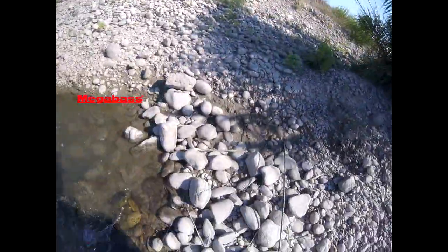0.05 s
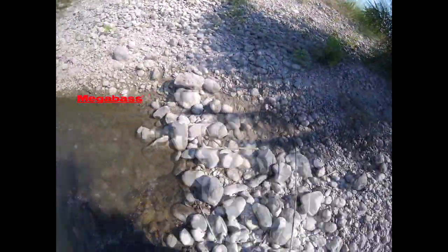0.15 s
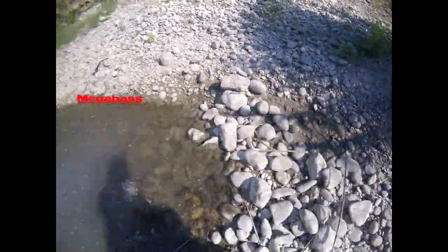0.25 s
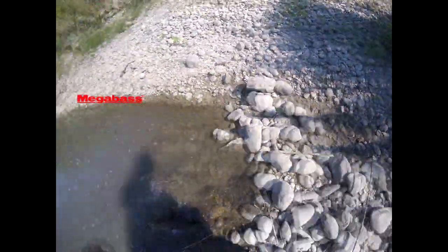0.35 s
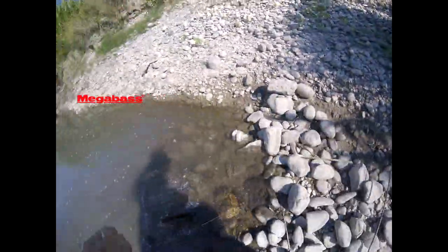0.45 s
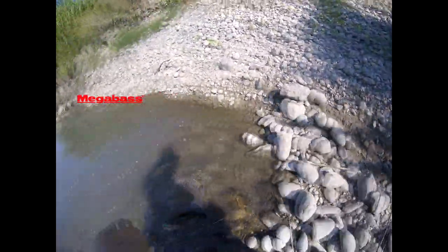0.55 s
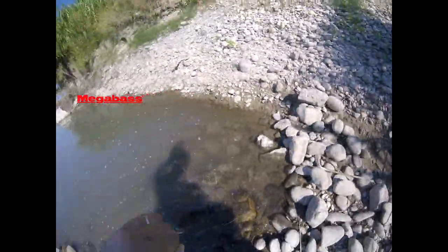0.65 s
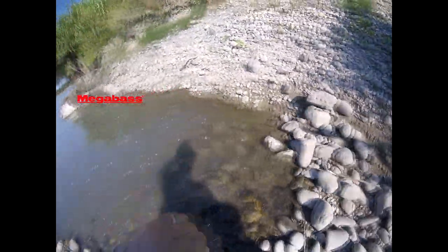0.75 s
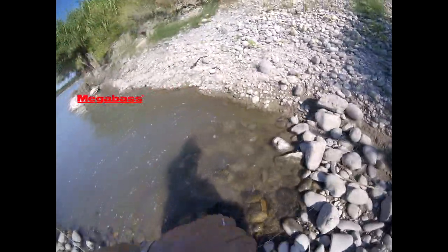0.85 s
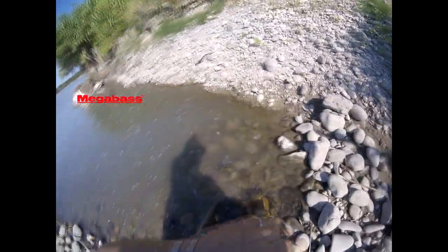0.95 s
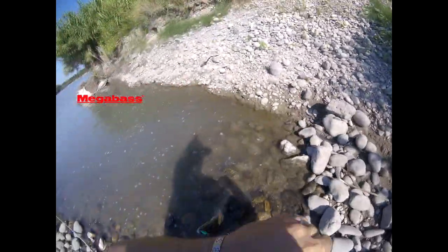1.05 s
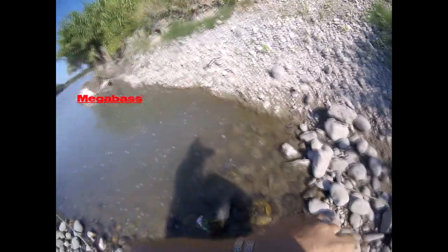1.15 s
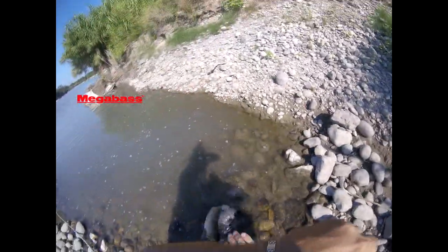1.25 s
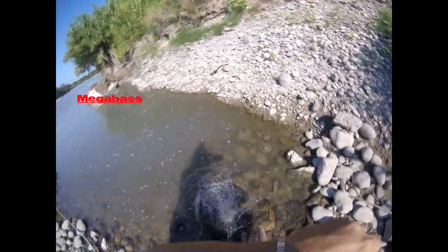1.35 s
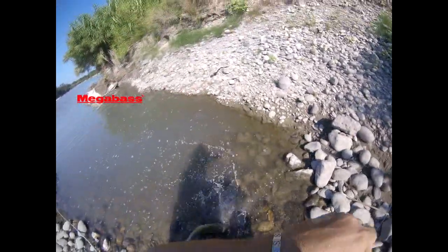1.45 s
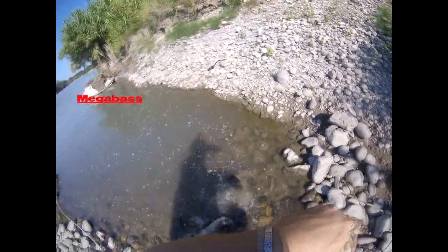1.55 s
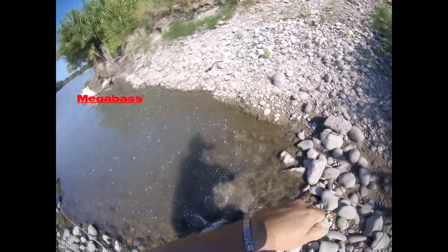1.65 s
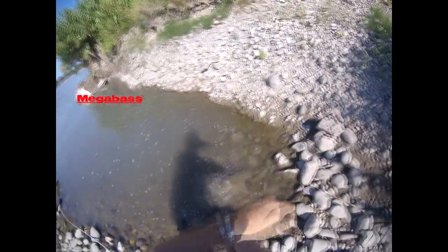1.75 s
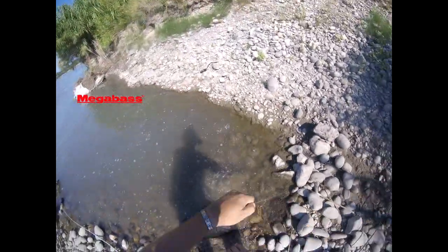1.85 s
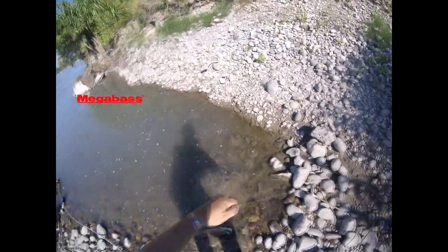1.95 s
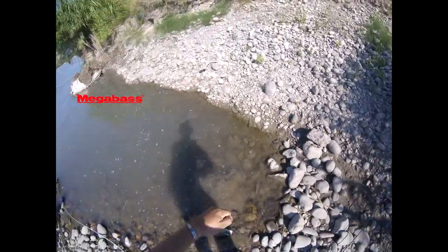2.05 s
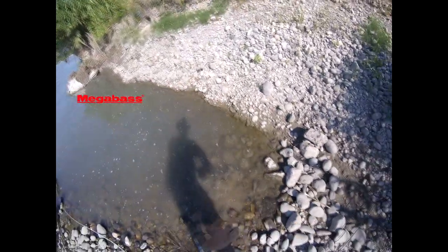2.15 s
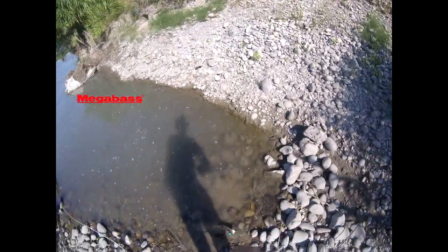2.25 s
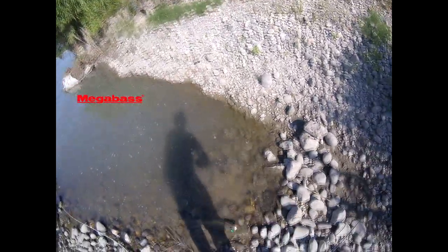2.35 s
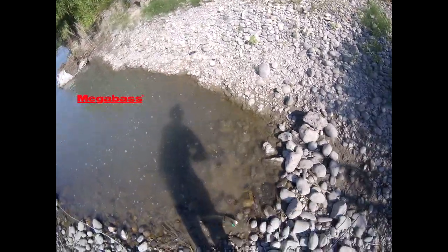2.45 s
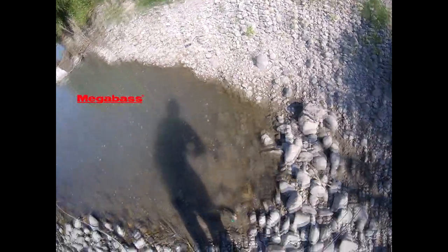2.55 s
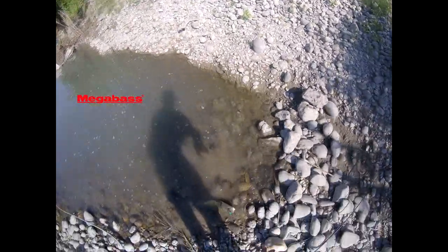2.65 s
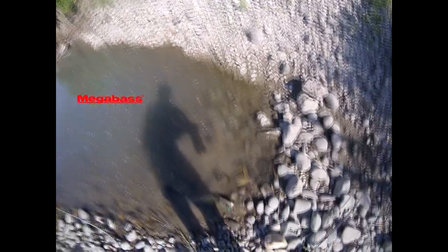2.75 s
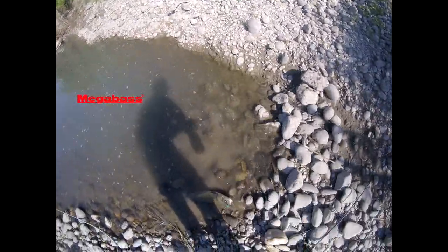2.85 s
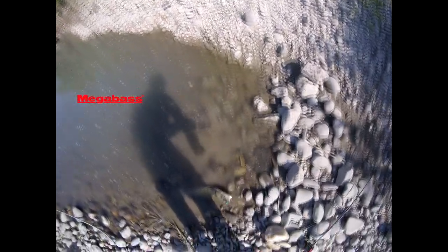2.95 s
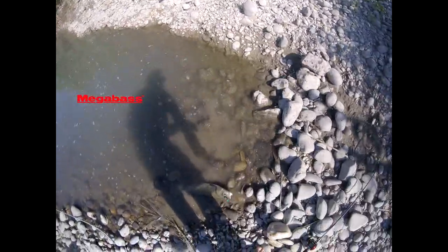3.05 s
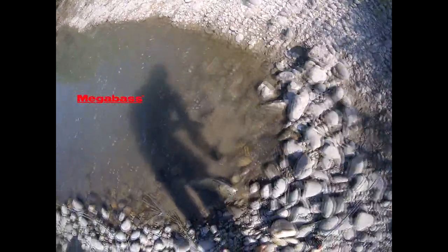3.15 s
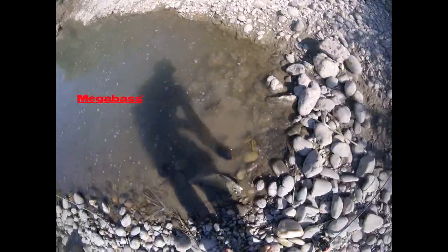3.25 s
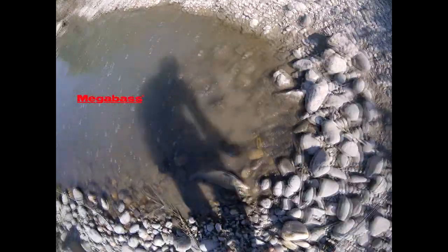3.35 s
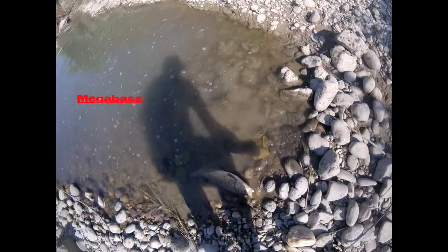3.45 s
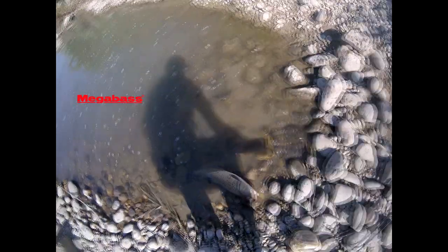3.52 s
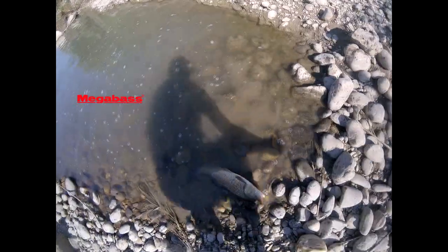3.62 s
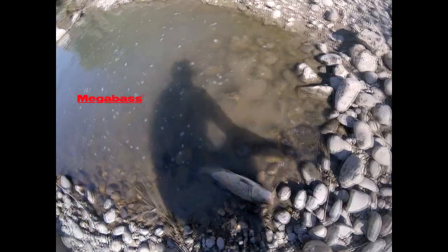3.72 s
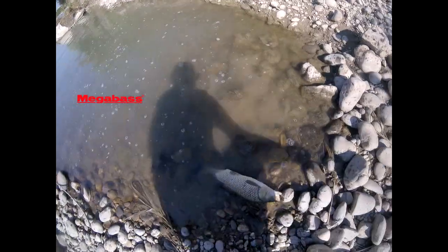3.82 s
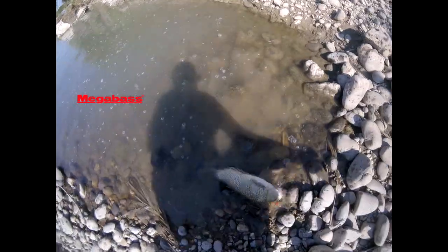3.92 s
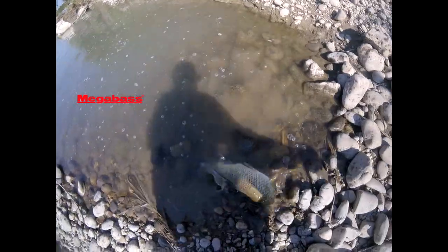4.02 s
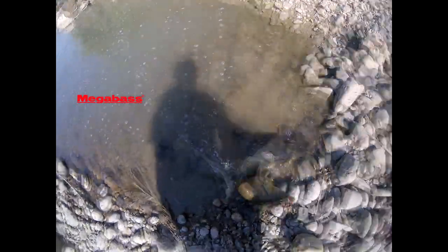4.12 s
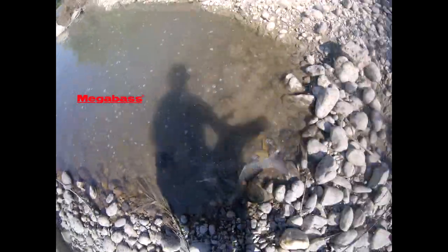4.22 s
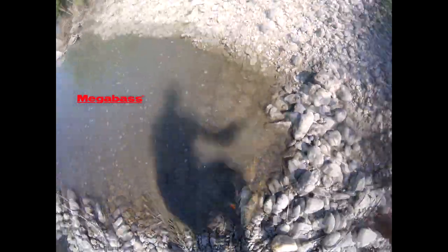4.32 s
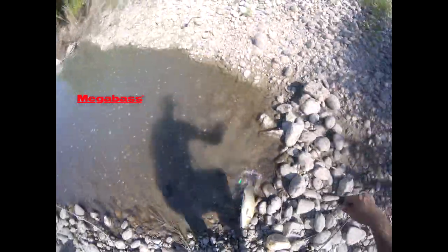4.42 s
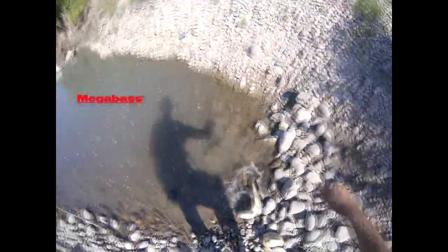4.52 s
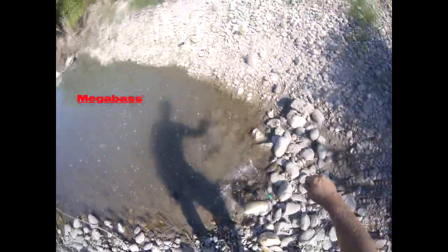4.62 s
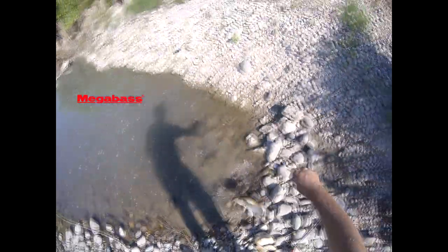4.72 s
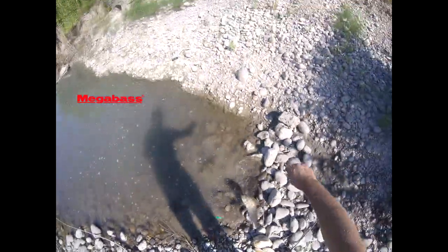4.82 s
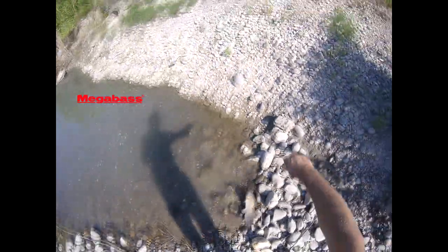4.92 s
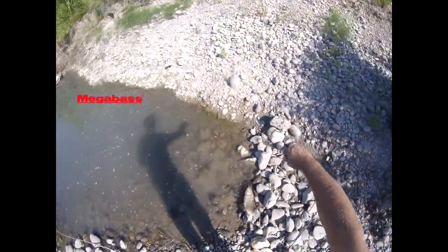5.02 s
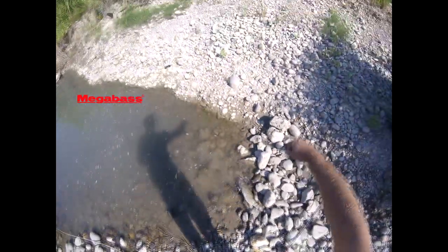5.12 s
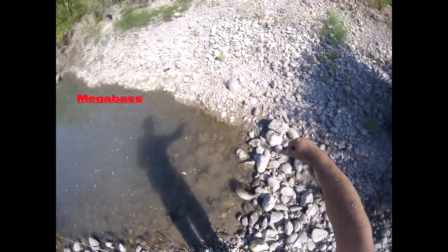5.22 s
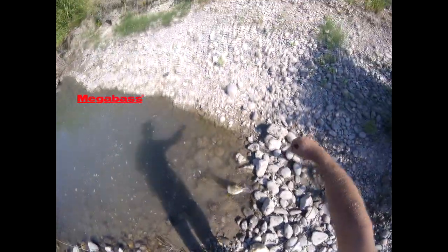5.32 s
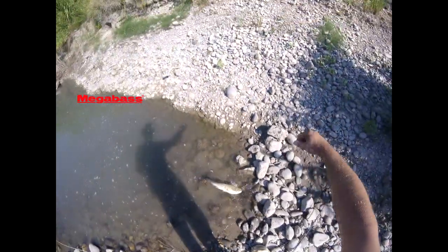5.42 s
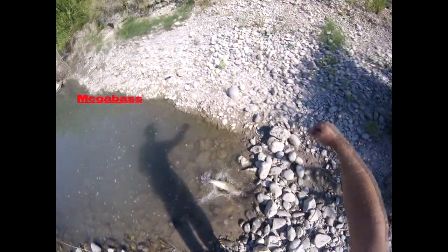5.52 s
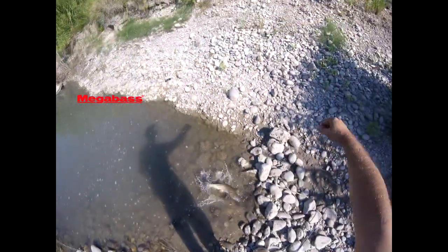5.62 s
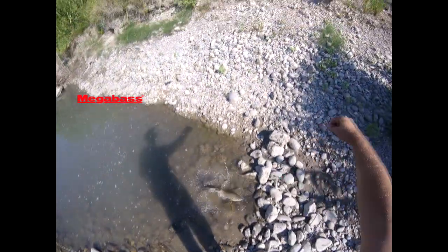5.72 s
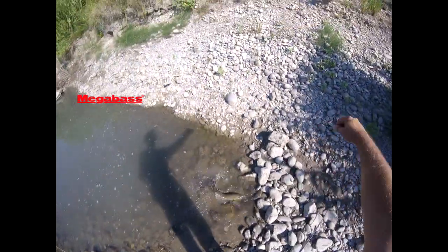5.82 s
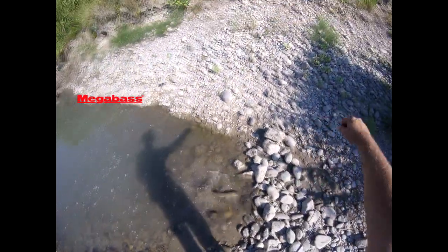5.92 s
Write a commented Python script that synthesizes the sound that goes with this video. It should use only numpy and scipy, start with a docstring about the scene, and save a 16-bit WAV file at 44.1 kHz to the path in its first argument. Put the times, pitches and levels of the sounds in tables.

```python
"""Hooked fish in the shallows

A fish thrashes by a stony river bank, heard by a small camera in a closed housing.
Slaps and drops are sharp blows with grainy bursts of noise; churning water is lumpy noise with tiny bubbles.
The housing gives both a broad hump near 2 kHz and a narrow port resonance near 6.5 kHz.
Larger bubbles are decaying tones; the far river, wind, knocks and hiss are coloured noise."""
import sys
import numpy as np
from scipy import signal
from scipy.fft import rfft, irfft
from scipy.io import wavfile
from scipy.ndimage import uniform_filter1d, map_coordinates

SR = 44100
rng = np.random.default_rng(int(sys.argv[2]) if len(sys.argv) > 2 else 0)


def dump(signal):
    """Clip the signal to [-1, 1] and save it as 16-bit WAV at the path in sys.argv[1]."""
    limited = np.clip(np.atleast_2d(signal).T, -1, 1)
    pcm = np.round(limited * 32767).astype(np.int16)
    wavfile.write(sys.argv[1], SR, pcm)


N = 263277  # length in samples


def amp(db):
    """Turns decibels into gain."""
    return 10 ** (np.asarray(db) / 20)


def unit(x):
    """Scales a signal to rms 1."""
    return x / np.sqrt(np.mean(x ** 2) + 1e-20)


def curves(rows):
    """Draws straight lines between rows: one value per sample for each column after the time."""
    seconds, *columns = np.transpose(rows)
    return [np.interp(np.arange(N) / SR, seconds, column) for column in columns]


def wobble(rate):
    """A smooth random curve through a given number of random points a second."""
    points = rng.standard_normal(int(N * rate / SR) + 4)
    return map_coordinates(points, [np.arange(N) * rate / SR])


def response(points, size=8192):
    """A filter of energy 1 with the shape of (Hz, dB) points, its sound packed towards the start."""
    hz = np.fft.rfftfreq(size, 1 / SR)
    point_hz, point_db = np.transpose(points)
    gain = amp(np.interp(np.log(hz + 1), np.log(point_hz), point_db))
    # folding the cepstrum (the spectrum of the log gain) makes the filter minimum phase
    cepstrum = irfft(np.log(gain + 1e-7))
    cepstrum[1:size // 2] *= 2
    cepstrum[size // 2 + 1:] = 0
    impulse = irfft(np.exp(rfft(cepstrum)))
    return impulse / np.linalg.norm(impulse)


def rush(points, patchy_db):
    """Coloured noise of rms 1, with patches of random gain across time and pitch."""
    spectrum = signal.stft(rng.standard_normal(N + 512), nperseg=512)[2]
    patches = uniform_filter1d(rng.standard_normal(spectrum.shape), size=6, axis=0)
    patches = uniform_filter1d(patches, size=10, axis=1)
    patchy_noise = signal.istft(spectrum * amp(patchy_db * unit(patches)), nperseg=512)[1]
    return unit(signal.fftconvolve(patchy_noise, response(points))[:N])


def ring(rows, size=4096):
    """Sum of bubbles: each is a tone with a soft start, a steady decay and a gliding pitch."""
    start, hz, db, t60, rise = np.transpose(rows)[:, :, None]
    t = np.arange(size) / SR
    envelope = amp(db - 60 * t / t60) * (1 - np.exp(-t * hz / 1.44))
    tone = envelope * np.sin(2 * np.pi * hz * (t + rise * t * t / 2))
    at = np.round(start * SR).astype(int) + np.arange(size)
    return np.bincount(at.ravel(), tone.ravel(), N + size)[:N]


def swarm(low_hz, high_hz, cycles, spread_db, count, size):
    """Many random bubbles, together of rms 1, uneven in pitch, level and life."""
    u = rng.random((count, 5))
    start = u[:, 0] * N / SR
    hz = low_hz * (high_hz / low_hz) ** u[:, 1]
    db = spread_db * u[:, 2] ** 3  # a few stand out
    t60 = cycles * 3 ** u[:, 4] / hz
    rise = 0.94 * u[:, 3] / t60
    rows = np.array([start, hz, db, t60, rise])
    return unit(ring(rows.T, size))


# How hard the water churns before the housing; the drips and the gurgle follow it too.
# Each row: time in seconds, body level in dB, spray level in dB over the body.
CHURN_LEVELS = [(0.0, -39, -14), (0.11, -45.5, -9.5), (0.33, -50, -10.5), (0.53, -58.5, -8.5),
                (1.1, -61.5, -9), (1.3, -42.5, -9.5), (1.47, -44, -6.5), (1.6, -42, -4.5),
                (1.68, -41, -12.5), (1.8, -46, -5.5), (1.97, -62.5, -3.5), (2.2, -66, -2), (2.5, -75, -7),
                (3.5, -71.5, -10), (3.91, -58, -8), (3.97, -42.5, -8.5), (4.13, -43.5, -9), (4.3, -54.5, 2),
                (4.53, -46.5, -9), (4.78, -56.5, -2), (5.1, -59, -5.5), (5.28, -59, -13), (5.49, -62.5, -3),
                (5.65, -49, -9.5), (5.72, -51, -5.5), (5.97, -64, -3)]


def churn():
    """Sloshing water: noise in lumps, with bubbles in the body and fine droplets in the spray."""
    body_db, spray_db = curves(CHURN_LEVELS)
    lumps_db = 1.3 * wobble(60) + 1.65 * wobble(300)  # shared by body and spray
    bubbling = swarm(443.7, 4080, cycles=12.6, spread_db=14.5, count=4500, size=1100)
    body = unit(1.1 * rng.standard_normal(N) + bubbling)
    droplets = swarm(3210, 17400, cycles=7.6, spread_db=14.5, count=7000, size=200)
    spray = unit(1.35 * rng.standard_normal(N) + droplets)
    lumpy_body = unit(body * amp(lumps_db + 2.3 * wobble(150)))
    lumpy_spray = unit(spray * amp(lumps_db + 1.3 * wobble(120)))
    return np.array([amp(body_db) * lumpy_body, amp(body_db + spray_db) * lumpy_spray])


# How the housing colours the body of a splash: a hump near 2 kHz, falling away steeply above 4 kHz.
# Each row: frequency in Hz, relative gain in dB.
HOUSING_BODY = [(150, -43), (250, -10), (443, -13), (618, -14.5), (739, -9.5), (937, -9.5), (1230, -5.5),
                (2060, 5), (4300, -18.5), (5590, -69), (9460, -120)]
# How the housing colours the spray, strongest at the port resonance.
# Each row: frequency in Hz, relative gain in dB.
HOUSING_SPRAY = [(2200, -48), (3700, -17), (4250, -14), (4890, -5), (5450, -4), (5920, -9.5), (6340, -1.5),
                 (6540, 1.5), (6770, -5), (7340, -21), (8600, -30), (9500, -26), (10300, -34),
                 (14300, -49.5), (16000, -63)]


def housing(body, spray):
    """The case filters the body of a splash and its spray separately, then adds them."""
    coloured_body = signal.fftconvolve(body, response(HOUSING_BODY))
    coloured_spray = signal.fftconvolve(spray, response(HOUSING_SPRAY))
    return (coloured_body + coloured_spray)[:N]


# Single bubbles that stand out.
# Each row: start in seconds, starting pitch in Hz, level in dB, time to fall 60 dB in seconds,
# pitch rise as a share of the starting pitch per second (negative falls).
SINGLE_BUBBLES = [(0.0, 986, -26, 0.049, 26), (0.053, 1880, -9, 0.0082, 13), (0.103, 417, -36, 0.08, 13.5),
                  (0.146, 1470, -31, 0.027, 35), (0.151, 568, -36, 0.091, 32),
                  (0.171, 1470, -27.5, 0.043, 15), (0.23, 1940, -30.5, 0.034, -2),
                  (0.354, 656, -34, 0.041, 36), (0.393, 253, -29.5, 0.15, 11), (0.466, 1024, -36, 0.052, 1),
                  (0.541, 700, -34, 0.072, 0.5), (0.755, 1350, -34, 0.043, 12), (0.748, 466, -39, 0.043, 4),
                  (1.19, 990, -30, 0.025, 10), (1.234, 894, -25.5, 0.078, -6.5), (1.26, 259, -20, 0.032, 4),
                  (1.506, 320, -24, 0.025, 5), (1.526, 230, -23.5, 0.032, 4),
                  (1.268, 611, -20.5, 0.11, -2.5), (1.278, 471, -18, 0.037, 4),
                  (1.285, 740, -20, 0.052, -4.5), (1.309, 1106, -24, 0.04, 19),
                  (1.367, 710, -14.5, 0.013, 57), (1.453, 1590, -31, 0.023, 10),
                  (1.625, 402, -34, 0.06, -2), (1.69, 452, -37.5, 0.1, 0.5),
                  (1.708, 1323, -25.5, 0.068, 25.5), (1.95, 1110, -38.5, 0.059, 14.5),
                  (3.802, 880, -32, 0.023, 49), (3.924, 840, -21.5, 0.025, -4), (3.943, 734, -27, 0.052, 1),
                  (4.019, 1570, -15, 0.025, 35), (4.175, 930, -42, 0.063, 10), (4.273, 676, -18, 0.019, 25),
                  (4.312, 1346, -13.5, 0.02, 47), (4.328, 433, -7, 0.017, 11),
                  (4.518, 400, -37, 0.14, 19.5), (4.55, 800, -39, 0.08, 45), (4.575, 367, -23, 0.024, 28),
                  (4.75, 800, -42.5, 0.068, 18), (4.841, 386, -33.5, 0.043, -1),
                  (4.983, 394, -25, 0.027, 2), (5.382, 1016, -36, 0.042, 4), (5.585, 940, -26.5, 0.031, 39),
                  (5.645, 1460, -23, 0.023, 56), (5.686, 1810, -26, 0.028, 26),
                  (5.773, 2030, -26, 0.014, 16), (5.802, 640, -44, 0.07, 0.5), (5.93, 1290, -40, 0.03, 60),
                  (5.89, 652, -42, 0.076, -1)]


def bubbles():
    """Each pocket of air rings at its own pitch, which glides as the ringing dies."""
    return ring(SINGLE_BUBBLES)


GURGLE_DB = -12.5  # over the churn's body level


def gurgle():
    """Larger bubbles ring at random times, as a swarm that swells and fades with the churn."""
    level_db, _ = curves(CHURN_LEVELS)
    return amp(level_db + GURGLE_DB) * swarm(450, 1994, cycles=19.8, spread_db=10.5, count=700, size=4096)


# The tone colour of the far river. Each row: frequency in Hz, relative level in dB per Hz.
RIVER_COLOUR = [(120, -36.5), (200, -3), (280, -10.5), (360, -8), (470, -10), (890, -11), (1580, -13.5),
                (4200, -29.5), (5940, -31.5), (6510, -15.5), (7300, -27), (8200, -43), (12000, -120)]
RIVER_DB = -58.5  # middle level


def river():
    """Far rushing water blends into steady coloured noise that wavers a little."""
    level_db = RIVER_DB + 0.36 * wobble(2.5)
    return amp(level_db) * rush(RIVER_COLOUR, patchy_db=0.55)


# Wind on the microphone. Each row: time in seconds, rumble level in dB.
WIND_LEVELS = [(0, -50), (.25, -44.5), (.6, -49), (1.2, -48.5), (1.38, -43.5), (1.6, -47), (1.98, -50.5),
               (2.56, -46.5), (3.0, -48), (3.69, -46.5), (4.44, -45), (4.8, -51.5), (5.97, -55.5)]
# The tone colour of the deep rumble, also used by the jostle's thud.
# Each row: frequency in Hz, relative level in dB per Hz.
RUMBLE_COLOUR = [(10, -15.5), (25, -0.5), (60, -9), (90, -28), (150, -52), (300, -120)]
# The tone colour of the higher flutter, also used by the jostle's shudder.
# Each row: frequency in Hz, relative level in dB per Hz.
FLUTTER_COLOUR = [(20, -71), (40, -27), (80, 5), (130, -3.5), (250, -18), (500, -30), (1500, -120)]
# middle flutter level, share of the wind's swing it follows, size of its random gusts
FLUTTER_DB, FLUTTER_FOLLOWS, GUST_DB = -52, 0.71, 1.13


def wind():
    """Gusts push the microphone's membrane in slow lumps, with a faster flutter above."""
    strength_db, = curves(WIND_LEVELS)
    swing_db = strength_db - strength_db.mean()
    flutter_db = FLUTTER_DB + FLUTTER_FOLLOWS * swing_db + GUST_DB * wobble(6)
    rumble = amp(strength_db) * rush(RUMBLE_COLOUR, patchy_db=-1.15)
    return rumble + amp(flutter_db) * rush(FLUTTER_COLOUR, patchy_db=-3.0)


# level over the churn, spread of levels, middle spray level over the body
DRIP_DB, DRIP_SPREAD_DB, DRIP_SPRAY_DB = 3.5, 2, -7
DRIP_T60_S, DRIP_SHARP = .03, .55  # time to fall 60 dB, sharpness 0-1


def drips(count):
    """Small drops land at random, louder where the water churns harder; rows like those of the slaps."""
    u = rng.random((count, 3))
    when = u[:, 0] * N / SR
    churn_db = np.interp(when, *np.transpose(CHURN_LEVELS)[:2])
    level_db = churn_db + DRIP_DB - DRIP_SPREAD_DB * np.log(u[:, 1])
    spray_db = DRIP_SPRAY_DB + 14 * (u[:, 2] - .5)
    return [(s, db, spray, DRIP_T60_S, DRIP_SHARP) for s, db, spray in zip(when, level_db, spray_db)]


# Slaps and drops on the surface, before the housing.
# Each row: start in seconds, level in dB, spray level in dB over the body,
# time for the burst to fall 60 dB in seconds, sharpness from 0 (soft) to 1 (sharp).
SLAP_HITS = [(0.0282, -24, -18, 0.058, 0.5), (0.0406, -20.5, -18, 0.075, 0.5), (0.0527, -20, -9, 0.15, 0.7),
             (0.0654, -15, -19, 0.033, 0.5), (0.0942, -22.5, -4.5, 0.04, 0.7),
             (0.1088, -19.5, -8, 0.044, 0.5), (0.259, -32.5, -8.5, 0.086, 0.5),
             (0.314, -31, -7, 0.029, 0.7), (0.3466, -27.5, -19, 0.029, 0.6), (0.3671, -32, -28, 0.051, 0.5),
             (0.396, -22.5, -9.5, 0.032, 0.6), (0.4778, -29, -17, 0.093, 0.64),
             (0.756, -33.5, -12, 0.15, 0.64), (0.7983, -33, -3, 0.14, 0.63), (0.918, -35.5, -7, 0.063, 0.4),
             (0.9427, -30, -6, 0.056, 0.6), (0.9728, -39, 3.5, 0.047, 0.58),
             (1.0047, -34.5, -8.5, 0.055, 0.6), (1.1847, -30.5, 1, 0.025, 0.64),
             (1.2281, -16, -8, 0.021, 0.65), (1.2342, -15.5, -10, 0.04, 0.3),
             (1.2477, -16.5, -6.5, 0.079, 0.5), (1.2663, -11.5, -31, 0.032, 0.64),
             (1.2716, -7, -18, 0.085, 0.76), (1.2872, -27, -4, 0.056, 0.2), (1.298, -26, -21, 0.078, 0.2),
             (1.4064, -27, -16, 0.037, 0.6), (1.4274, -33, 1, 0.035, 0.8), (1.504, -22.5, -8, 0.15, 0.45),
             (1.5078, -11.5, -20, 0.022, 0.77), (1.5264, -11, -10.5, 0.091, 0.71),
             (1.5696, -28, -13, 0.053, 0.5), (1.5986, -25, -12, 0.056, 0.5),
             (1.6306, -24.5, 5, 0.017, 0.56), (1.661, -24, -21, 0.036, 0.5), (1.707, -24, -20, 0.071, 0.4),
             (1.754, -19.5, -35, 0.035, 0.4), (1.7782, -37, -1, 0.024, 0.5), (1.8249, -32, -1, 0.042, 0.58),
             (1.944, -36, 0, 0.039, 0.56), (2.0227, -30, -13, 0.044, 0.62), (2.2184, -40, 0.5, 0.03, 0.77),
             (2.2414, -42, -5.5, 0.047, 0.4), (2.2785, -51, 0, 0.04, 0.5), (3.917, -13, -9, 0.046, 0.64),
             (3.9222, -14, -13, 0.018, 0.45), (3.9307, -10, -11, 0.062, 0.68),
             (3.943, -25.5, 3.5, 0.04, 0.35), (3.9534, -18.5, -7, 0.042, 0.36),
             (3.9735, -21.5, -5, 0.055, 0.75), (3.9853, -20.5, -6.5, 0.038, 0.3),
             (4.0159, -14, -20, 0.045, 0.5), (4.0468, -25, -27, 0.04, 0.7),
             (4.112, -10, -11.5, 0.035, 0.57), (4.142, -26, -16, 0.04, 0.6),
             (4.1811, -17.5, -10.5, 0.025, 0.4), (4.2344, -25, -7, 0.031, 0.63),
             (4.263, -17.5, -8, 0.039, 0.5), (4.269, -21.5, -3, 0.059, 0.6),
             (4.3066, -16.5, -4.5, 0.05, 0.53), (4.3306, -9, -9.5, 0.057, 0.7),
             (4.36, -3.5, -13.5, 0.022, 0.81), (4.364, -18.5, -23, 0.058, 0.5),
             (4.4174, -14, -15.5, 0.048, 0.58), (4.4291, -21.5, -8.5, 0.035, 0.6),
             (4.4451, -22, -10, 0.056, 0.58), (4.465, -18, -3.5, 0.029, 0.64),
             (4.508, -14, -9.5, 0.045, 0.56), (4.5726, -18, -8.5, 0.039, 0.5),
             (4.6213, -23.5, -1.5, 0.056, 0.6), (4.6394, -22.5, -11, 0.047, 0.67),
             (4.6555, -11, -17.5, 0.023, 0.77), (4.6957, -31.5, 0, 0.033, 0.54),
             (4.7258, -18, 11.5, 0.016, 0.7), (4.8374, -28.5, 0.5, 0.06, 0.37),
             (4.9806, -26.5, 1, 0.029, 0.68), (4.9978, -23.5, -12, 0.039, 0.56),
             (5.0096, -20.5, -13, 0.022, 0.56), (5.0347, -33, -6, 0.034, 0.5),
             (5.0483, -33.5, 3, 0.026, 0.83), (5.0866, -34, 2, 0.026, 0.54),
             (5.1287, -22.5, -8, 0.074, 0.63), (5.1619, -22.5, -5, 0.081, 0.42),
             (5.1981, -24, -7, 0.071, 0.63), (5.217, -26.5, -4, 0.12, 0.53), (5.2266, -17.5, -11, 0.03, 0),
             (5.2489, -30, -4, 0.037, 0.3), (5.4568, -26.5, 2, 0.037, 0.56),
             (5.4708, -15.5, -13, 0.097, 0.81), (5.4994, -26.5, -19, 0.14, 0.65),
             (5.533, -29, -20, 0.072, 0.63), (5.6341, -23.5, -11, 0.034, 0.54),
             (5.7052, -34.5, -5, 0.046, 0.5), (5.7334, -23.5, -19, 0.047, 0.5),
             (5.8082, -27, -13, 0.08, 0.52), (5.843, -27, -22, 0.042, 0.58),
             (5.891, -31.5, -26, 0.035, 0.5), (5.9364, -27.5, -11, 0.024, 0.53)]
SWELL_S, SOFT_SWELL_S = 0.00056, 0.0055  # rise of a sharp burst, extra for a soft one
BURST, BLOW = [[.82], [1.285]], [4.44, 4.3]  # sizes in body and spray of the grainy burst and of the first blow


def slaps():
    """Each slap is a sharp blow and a grainy burst that swells, slower for softer contact, and dies."""
    out = np.zeros((2, N + SR))  # body and spray
    t = np.arange(SR // 5) / SR
    for start, db, spray_db, t60, sharp in SLAP_HITS + drips(count=90):
        sharp = np.clip(sharp, 0, 1)
        swell = 1 - np.exp(-t / (SWELL_S + SOFT_SWELL_S * (1 - sharp) ** 2))
        # the sheet of water tears into spits about a millisecond long
        knots = t[::60]
        spits = unit(amp(4 * np.interp(t, knots, rng.standard_normal(len(knots)))))
        envelope = spits * amp(-60 * t / t60) * swell
        slap = rng.standard_normal((2, len(t))) * envelope * np.array(BURST) * (1 - sharp)
        slap[:, 0] = np.array(BLOW) * sharp ** 2  # the blow is a single-sample click
        out[:, round(start * SR):][:, :len(t)] += amp([[db], [db + spray_db]]) * slap
    return out[:, :N]


# Moments when the housing is jostled.
# Each row: peak time in seconds, knock level in dB, rise and fall in seconds per 10 dB.
JOSTLES = [(4.07, -42, 0.017, 0.0544), (4.27, -41.5, 0.042, 0.04), (4.331, -38, 0.035, 0.003)]
# The tone colour of the knocks. Each row: frequency in Hz, relative level in dB per Hz.
KNOCK_COLOUR = [(40, -69), (120, -5.5), (300, -6.5), (500, -23), (1500, -120)]
JOSTLE_THUD_DB, JOSTLE_SHUDDER_DB = 11.5, 4.5  # over the knock


def jostle():
    """Shaking the camera sends dull knocks, a shudder and a deep thud through the case."""
    t = np.arange(N) / SR
    shake = sum(amp(db - 10 * np.maximum((peak - t) / rise, (t - peak) / fall))
                for peak, db, rise, fall in JOSTLES)
    knock = rush(KNOCK_COLOUR, patchy_db=3.5)
    thud = amp(JOSTLE_THUD_DB) * rush(RUMBLE_COLOUR, patchy_db=1.4)
    shudder = amp(JOSTLE_SHUDDER_DB) * rush(FLUTTER_COLOUR, patchy_db=1.6)
    return shake * (knock + thud + shudder)


def scene():
    """Adds splashes through the housing to the bubbles, river, wind and handling."""
    splashes = housing(*(churn() + slaps()))
    return (splashes + bubbles() + gurgle() + river() + wind() + jostle())[None]


# The tone colour of the microphone's own noise. Each row: frequency in Hz, relative level in dB per Hz.
HISS_COLOUR = [(3000, -35), (7000, 1), (9500, -5), (10500, -12.5), (12700, -9.5), (13100, -35),
               (16000, -59)]
HISS_DB = -69.5  # before the band limit
TOP_HZ = 14300  # band limit


def record(dry):
    """The camera adds its own hiss, and a steep low-pass cuts sound above its band limit by 80 dB."""
    noisy = dry + amp(HISS_DB) * rush(HISS_COLOUR, patchy_db=2.8)
    return signal.sosfilt(signal.ellip(10, .5, 80, TOP_HZ, fs=SR, output="sos"), noisy)


dry = scene()
out = record(dry)
dump(out)
```